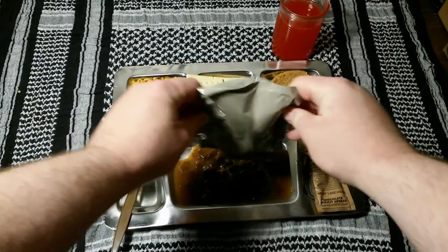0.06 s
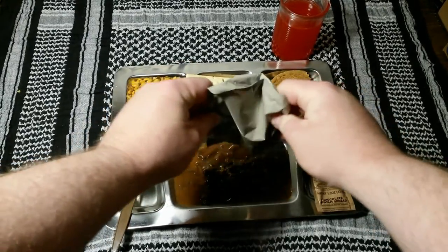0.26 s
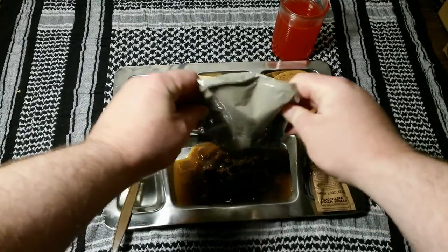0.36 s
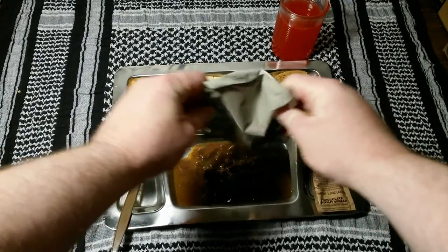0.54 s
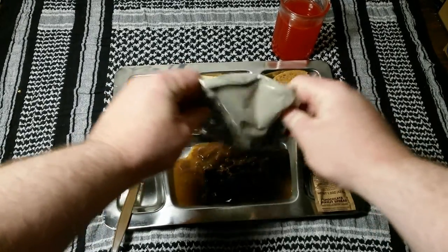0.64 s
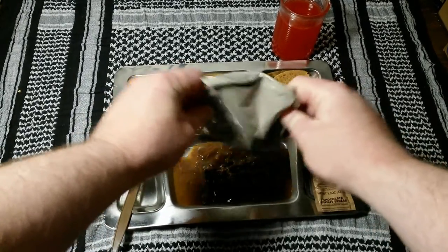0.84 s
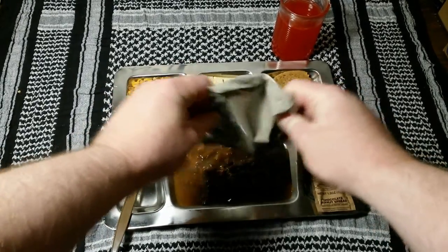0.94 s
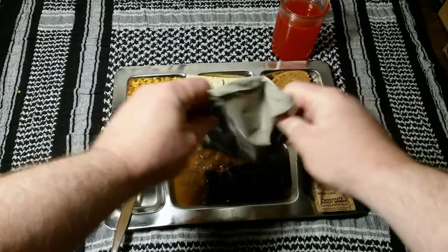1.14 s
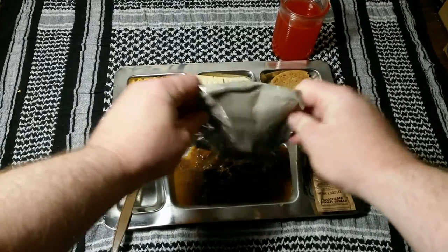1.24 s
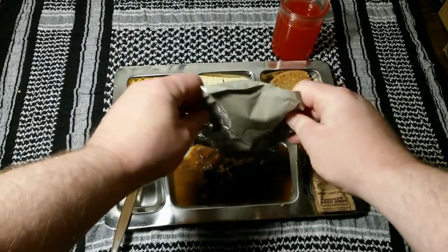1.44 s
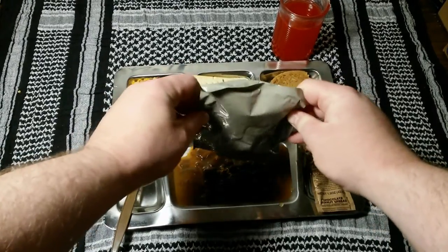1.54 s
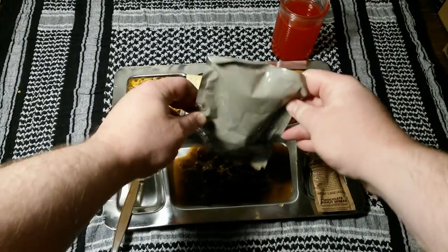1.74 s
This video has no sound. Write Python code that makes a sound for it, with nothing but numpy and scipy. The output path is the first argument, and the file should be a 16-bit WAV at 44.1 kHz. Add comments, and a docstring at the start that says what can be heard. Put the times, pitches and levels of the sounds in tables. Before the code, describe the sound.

A stiff foil pouch crinkles close up. A small snap and pop at 0.08 s leads to the loudest, brightest crackling cluster around 0.2 s. Lighter snaps follow near 0.37 and 0.52, then crackles and hollow pops at 0.6-0.9. Soft kneading rustle and denser crinkling run from 1.0 to 1.33, thinning to sparse ticks by 1.66. Short small-room reflections, slight tray ring, faint air, hum and wavering low rumble.

```python
"""A foil pouch is squeezed over a tray, close to the microphone in a small kitchen.
Creases snap as ragged noise bursts and ring the sheet's modes; scattered ticks make crackle and rustle.
Whole panels buckle with hollow pops, each a rising decaying sine inside a dull burst of noise.
Resonant filters ring the tray, and decaying noise responses supply near reflections and a short room tail.
Beneath lie noise-made room air, a faint mains hum and a low rumble of varying level."""
import sys
import numpy as np
from scipy import signal
from scipy.fft import rfft, irfft, next_fast_len
from scipy.io import wavfile

SR = 44100
rng = np.random.default_rng(int(sys.argv[2]) if len(sys.argv) > 2 else 0)


def materialize(psi):
    """Save the field psi as 16-bit PCM at rate SR to the path in sys.argv[1].

    A 1-D psi becomes a single channel; in a 2-D psi each row is a channel.
    """
    bounded = np.clip(np.atleast_2d(psi).T, -1, 1)
    quanta = np.round(bounded * 32767).astype(np.int16)
    wavfile.write(sys.argv[1], SR, quanta)


N = 77175
T = np.arange(N) / SR
BLOW_T = T[:2048]  # time axis of one snap or pop

# Level, left-minus-right level and likeness of the two channels (0-1) in each kind of burst.
CRACK_LEVEL_DB, CRACK_PAN_DB, CRACK_LIKENESS = 1.79, -4.1, 0.34
FOIL_LEVEL_DB, FOIL_PAN_DB, FOIL_LIKENESS = -1.2, -2.1, 0.8
POP_LEVEL_DB, POP_PAN_DB, POP_LIKENESS = -9.5, -2.6, 1

FOIL_DECAY_S, TYPICAL_CRACK_MS = 0.0062, 2.8
RING_LENGTH_LAW = 0.36  # exponent: a shorter crack leaves a shorter ring
SOFT_ATTACK_SHARE = 0.17  # a slower crease also takes longer to give way

# Crease snaps. Each row: start in seconds, relative crack level in dB, relative foil ring level in dB,
# crack brightness in dB per octave, crack decay (to 1/e) in milliseconds.
CREASE_SNAPS = [(.006, -46.5, -53.5, -12.5, 2.1), (0.074, -47, -41.5, -11, 4.9),
                (0.0833, -28, -39, -6.5, 0.66), (0.0866, -42.5, -34, 10, 3), (0.105, -40.5, -38, -0.5, 4.8),
                (.122, -38, -46.5, -3.5, 5), (.183, -32, -34.5, 5, 2.5), (0.1979, -27, -34, 0.5, 2.5),
                (0.2025, -14.5, -26, 10, 1.2), (0.2112, -23.5, -33.5, -6, 0.93),
                (0.214, -27, -29, -10.5, 0.47), (0.2228, -37, -38, -8.5, 1.3), (0.228, -29, -52, 9.5, 2.2),
                (0.2326, -25.5, -29, -3, 1.03), (0.3587, -43, -41, -5, 6.1),
                (0.3691, -39, -39.5, 12.5, 1.6), (.377, -33.5, -35, 0, 3.26), (.441, -70, -46.5, -9, 3.5),
                (.469, -62, -44.5, -9, 4.6), (0.504, -45, -41, -15.5, 2.4), (.524, -38.5, -38.5, -7, 2.1),
                (0.6032, -46, -41.5, -3, 6.6), (0.6193, -41, -37, 0, 2.2), (0.6255, -48, -36.5, -10, 3.4),
                (0.64, -47, -42.5, -12, 4), (.6575, -33, -33.5, -4.5, 2.5), (.663, -46, -54, -10, 1.6),
                (0.686, -40, -46, -1, 1.2), (0.6899, -34, -50, -9, 2.1), (0.7021, -25, -30, 2, 2.13),
                (0.8153, -53, -43.5, -1, 5.4), (.8395, -38.5, -49, -7.5, 1.3),
                (.8418, -30, -29, -8.5, 0.97), (0.8953, -37.5, -37.5, 2, 2.4), (.923, -48.5, -47, 6, 5.3),
                (.929, -49, -47.5, -9, 6.5), (.9425, -38.5, -44.5, -9.5, 1.5),
                (1.007, -35, -39.5, -8, 0.66), (1.0243, -38, -38.5, -7, 0.77), (1.031, -55, -39.5, -1, 2),
                (1.0458, -30.5, -33.5, -3, 2.5), (1.0949, -36.5, -43.5, -2, 2.9),
                (1.1078, -49, -40.5, -2, 1.3), (1.117, -44, -40.5, -9, 1.1), (1.1254, -56, -35, 2, 1.3),
                (1.1293, -44, -54, -12, 0.54), (1.165, -40, -55, -3.5, 1.14), (1.209, -52, -43.5, 1, 11),
                (1.2254, -30.5, -32.5, 1.5, 5), (1.233, -49, -32.5, 5, 1.1), (1.2498, -34.5, -35, 9, 1.8),
                (1.2539, -31, -30.5, -7.5, 1.8), (1.260, -39.5, -47, -5, 1.3), (1.292, -46, -38, 1, 2.1),
                (1.3, -38, -36, -8, 6), (1.3052, -27, -33.5, -7, 2.4), (1.3145, -31.5, -28.5, 1, 3.3),
                (1.326, -41, -33.5, -4, 4.3), (1.406, -51, -38, 0, 2), (1.419, -52, -43.5, 1, 1.4),
                (1.4279, -38.5, -40.5, -0.5, 1.7), (1.4825, -41.5, -36.5, -2, 2.5),
                (1.496, -35.5, -38, 1.5, 1.7), (1.6445, -55, -50, 7, 3), (1.6628, -48, -44, 10, 1.3)]
# Spectral shape of a crack. Each row: frequency in Hz, relative density in dB per Hz.
CRACK_COLOUR = [(150, -43.5), (900, -24.5), (1500, -24), (2200, -5.5), (3000, -4.5), (4000, 1.5), (6000, 2),
                (8000, -6), (10000, -13.5), (12000, -22), (15000, -37.5)]
# Spectral shape of the ringing foil. Each row: frequency in Hz, relative density in dB per Hz.
FOIL_COLOUR = [(120, -30.5), (220, -16.5), (450, 0), (620, -11), (760, 0), (860, -4), (1020, 1),
               (1170, -2.5), (1400, -8), (1600, -11), (1830, -7), (2150, -22), (2800, -12), (5000, -45)]


def creases():
    """Impulsive excitation: each snap is a crack, and a lower ring of the foil around it."""
    out = np.zeros((2, N))
    for start, crack_db, ring_db, tilt, decay_ms in CREASE_SNAPS:
        decay_s = decay_ms / 1000
        length = (decay_ms / TYPICAL_CRACK_MS) ** RING_LENGTH_LAW
        crack = burst(CRACK_COLOUR, decay_s, CRACK_LEVEL_DB, CRACK_PAN_DB, CRACK_LIKENESS,
                      tilt, SOFT_ATTACK_SHARE * decay_s)
        dense_ring = burst(FOIL_COLOUR, FOIL_DECAY_S * length, FOIL_LEVEL_DB, FOIL_PAN_DB, FOIL_LIKENESS)
        add(out, start, undb(crack_db) * crack)
        add(out, start, undb(ring_db) * (dense_ring + sheet_modes(length)))
    return out


MODE_SPREAD, RING_ATTACK_S = 0.04, 0.00059  # spread: standard deviation, as a share of the pitch
# Strongest modes of the stiff sheet. Each row: central frequency in Hz, relative level in dB,
# decay (to 1/e) in seconds before scaling by the ring length.
SHEET_MODES = [(753, -11, 0.0029), (1025, -7.5, 0.0069), (1119, -18, 0.0053), (1839, -18.5, 0.012)]


def sheet_modes(length):
    """Modal vibration: a few decaying sines, each detuned by the new fold."""
    ringing = 0
    for hz, db, decay_s in SHEET_MODES:
        detuned_hz = hz * (1 + MODE_SPREAD * rng.standard_normal())
        fade = np.exp(-BLOW_T / (decay_s * length))
        ringing = ringing + undb(db) * np.sin(2 * np.pi * detuned_hz * BLOW_T) * fade
    attack = 1 - np.exp(-BLOW_T / RING_ATTACK_S)
    return np.sqrt(2) * ringing * attack * pan(FOIL_PAN_DB)


CRACKLE_DB, CRACKLE_SCATTER_DB = -14, 4  # relative to the snap's crack level; standard deviation
CRACKLE_DELAY_S = 0.013  # mean wait after the snap


def crackle(count=3):
    """Stochastic relaxation: tiny creases give way at exponentially distributed delays after each snap."""
    out = np.zeros((2, N))
    for start, crack_db, *_ in CREASE_SNAPS:
        for _ in range(count):
            size_db = crack_db + CRACKLE_DB + CRACKLE_SCATTER_DB * rng.standard_normal()
            delay = CRACKLE_DELAY_S * rng.exponential()
            add(out, start + delay, undb(size_db) * tick(0.00047))
    return colour(out, CRACK_COLOUR) * pan(CRACK_PAN_DB)


BUCKLE_ATTACK_S = 0.00048
POP_TONE_DB = -3  # tone before each pop's own level
POP_GLIDE = 0.047  # the pitch rises by this share of the listed pitch as the panel settles
POP_HZ = 371  # the pitch at which a thud has the listed colour
POP_LOW_HZ = 151  # the pops carry little below this
# Panels buckling. Each row: start in seconds, relative level in dB, pitch midway through the glide in Hz,
# decay (to 1/e) in milliseconds.
PANEL_BUCKLES = [(.006, -46, 364, 6), (.087, -33.5, 393, 7.7), (.100, -42, 420, 3.5), (.187, -45, 402, 9.9),
                 (0.201, -47, 396, 3.3), (0.2133, -32, 427, 3.6), (0.2329, -29.5, 439, 6.4),
                 (.377, -33, 389, 6.7), (.468, -33.5, 321, 4.6), (0.576, -45, 315, 3.6),
                 (.621, -35, 359, 5.9), (0.7283, -31.5, 410.5, 6.8), (0.842, -32, 362, 3.5),
                 (0.895, -42.5, 366, 4.3), (0.978, -48, 338, 9), (1.024, -40, 430, 8.7),
                 (1.048, -41.5, 414, 5.1), (1.089, -46, 405, 3.4), (1.106, -39, 401, 5.7),
                 (1.1307, -31, 378, 4), (1.2281, -29.5, 349, 5.2), (1.244, -37.5, 442, 6.2),
                 (1.306, -31, 460, 2.3), (1.316, -32, 420, 6.9), (1.326, -35.5, 406, 5),
                 (1.406, -40, 370, 5), (1.427, -36.5, 407, 4.9), (1.484, -46.5, 393, 6)]
# Spectral shape of the thud at the reference pitch. Each row: frequency in Hz, relative density in dB per Hz.
POP_COLOUR = [(50, -32), (130, -23.5), (200, 4.5), (290, 0.5), (400, -3), (500, 0), (650, -2), (900, -11.5),
              (2000, -55)]


def panels():
    """Snap-through buckling: a flipping panel gives a hollow rising tone and a thud, lower if it is larger."""
    out = np.zeros((2, N))
    for start, db, hz, decay_ms in PANEL_BUCKLES:
        decay_s = decay_ms / 1000
        fade = np.exp(-BLOW_T / decay_s)
        pitch = hz * (1 + POP_GLIDE * (.5 - fade))
        phase = 2 * np.pi * np.cumsum(pitch) / SR
        tone = 2 * np.sin(phase) * fade * (1 - np.exp(-BLOW_T / BUCKLE_ATTACK_S))
        thud_colour = [(f * hz / POP_HZ, level) for f, level in POP_COLOUR]
        thud = burst(thud_colour, decay_s, POP_LEVEL_DB, POP_PAN_DB, POP_LIKENESS)
        add(out, start, undb(db) * (undb(POP_TONE_DB) * tone * pan(POP_PAN_DB) + thud))
    return signal.sosfilt(signal.butter(3, POP_LOW_HZ, "high", fs=SR, output="sos"), out)


KNEAD_CRACK_DB = -5  # crack-coloured part, relative to the foil-coloured part
# Kneading between the snaps. Each row: start in seconds, length in seconds, mean relative tick level in dB.
KNEADING = [(0.088, 0.065, -56.5), (0.446, 0.07, -54.5), (0.608, 0.14, -47.5), (0.899, 0.063, -59.5),
            (1.003, 0.16, -47.5), (1.236, 0.1, -50), (1.411, 0.079, -54.5)]


def rustle(count=18):
    """Granular friction: faint scattered ticks while the fingers knead the pouch."""
    out = np.zeros((2, N))
    for start, length, db in KNEADING:
        for k in range(count):
            when = start + length * (k + rng.random()) / count
            add(out, when, undb(db + 1.4 * rng.standard_normal()) * tick(0.0046))
    dull = colour(out, FOIL_COLOUR, tilt=-2.3)
    bright = colour(out, CRACK_COLOUR, tilt=-1.5)
    return (dull + undb(KNEAD_CRACK_DB) * bright) * pan(FOIL_PAN_DB)


# Fixed resonances of the tray and its surroundings. Each row: frequency in Hz, gain at the peak in dB
# before panning, time to fall by 60 dB in seconds.
TRAY_MODES = [(308, -6, .11), (395, -3.5, .1), (757, -7, .08), (1005, -8, .05), (1162, -12, .08),
              (1835, -15, .08)]


def surroundings(x):
    """Sympathetic resonance: the tray and the space around it ring briefly at their own pitches."""
    out = 0
    for hz, db, t60 in TRAY_MODES:
        q = np.pi * hz * t60 / np.log(1000)
        out = out + undb(db) * signal.lfilter(*signal.iirpeak(hz, q, fs=SR), x.mean(axis=0))
    return out * pan(FOIL_PAN_DB)


NEAR_DB, NEAR_T60_S = -7, 0.025
ROOM_DB, ROOM_T60_S, ROOM_BUILD_S = -5, 0.26, 0.011
TREBLE_HZ, TREBLE_T60_S = 3500, 0.15
ROOM_BASS_HZ = 500  # below this the reflections reach both channels alike
# Spectral shape of the reflections. Each row: frequency in Hz, relative density in dB per Hz.
REFLECTION_COLOUR = [(100, -21), (300, -2.5), (400, 0), (600, -8.5), (1500, -2), (4000, 0.5), (8000, 0),
                     (15000, 0.5)]


def echoes(x, db, t60, treble_t60, likeness):
    """Diffuse reverberation: dense reflections build up briefly and fade, the treble at its own pace."""
    noise = pair(N // 4, likeness)
    t = T[:N // 4]
    shared_bass = signal.butter(2, ROOM_BASS_HZ, fs=SR, output="sos")
    noise = noise + signal.sosfiltfilt(shared_bass, noise[1] - noise)
    below_treble = signal.sosfiltfilt(signal.butter(2, TREBLE_HZ, fs=SR, output="sos"), noise)
    build = 1 - np.exp(-t / ROOM_BUILD_S)
    fade = undb(-60 * t / t60) * build
    treble_fade = undb(-60 * t / treble_t60) * build
    decaying = below_treble * fade + (noise - below_treble) * treble_fade
    response = colour(decaying / np.linalg.norm(fade), REFLECTION_COLOUR)
    return undb(db) * signal.fftconvolve(x.mean(axis=0)[None], response, axes=1)[:, :N]


AIR_DB, AIR_LIKENESS, HISS_LIKENESS, AIR_BASS_HZ = -56.5, 0.53, 0.051, 1510
RUMBLE_DB = -6.5  # added to the rumble's level curve
# Spectral shape of the room air. Each row: frequency in Hz, relative density in dB per Hz.
AIR_COLOUR = [(25, -35.5), (120, -0.5), (250, 1), (460, -8), (750, -9), (1100, -17.5), (1800, -17.5),
              (3300, -22.5), (6000, -22), (13000, -23), (15000, -30)]
# Mains hum. Each row: frequency in Hz, RMS level in dB.
MAINS_HUM = [(59, -76.5), (119, -75)]
# Spectral shape of the rumble. Each row: frequency in Hz, relative density in dB per Hz.
RUMBLE_COLOUR = [(25, -17), (45, 0), (60, 10), (80, -10), (115, 19), (150, -12.5), (300, -53)]
# Level curve of the rumble. Each row: time in seconds, relative level in dB.
RUMBLE_CURVE = [(0.0, -55), (0.28, -63.5), (0.33, -46.5), (0.38, -60), (0.74, -68.5), (0.79, -51),
                (0.86, -61.5), (1.48, -65), (1.58, -47), (1.66, -58), (1.75, -47)]


def background():
    """Background noise and tones: air more alike on both sides in the bass, steady hum, varying rumble."""
    hiss = pair(N, HISS_LIKENESS)
    bass_filter = signal.butter(1, AIR_BASS_HZ, fs=SR)
    air = signal.lfilter(*bass_filter, pair(N, AIR_LIKENESS) - hiss) + hiss
    hum = 0
    for hz, db in MAINS_HUM:
        hum = hum + undb(db) * np.sqrt(2) * np.sin(2 * np.pi * (hz * T + rng.random()))
    rumble_gain = undb(RUMBLE_DB + np.interp(T, *np.array(RUMBLE_CURVE).T))
    rumble = rumble_gain * colour(pair(N, 0.71), RUMBLE_COLOUR)
    return undb(AIR_DB) * colour(air, AIR_COLOUR) + hum + rumble


RAGGED_DB = 6.5  # approximate spread of the level wandering


def burst(points, decay_s, level_db, pan_db, likeness, tilt=0, attack_s=.0001):
    """Dense modal response: a ragged noise kick dies away, with new noise for every kick."""
    fade = np.exp(-BLOW_T / decay_s)
    attack = 1 - np.exp(-BLOW_T / attack_s)
    ragged = undb(RAGGED_DB * walk(len(BLOW_T), 1000))
    x = colour(pair(len(BLOW_T), likeness) * fade * ragged * attack, points, tilt)
    # each channel gets the energy of the plain fade
    even = np.sqrt(np.sum(fade ** 2) / np.sum(x ** 2, axis=1, keepdims=True))
    return x * even * undb(level_db) * pan(pan_db)


def tick(decay_s, size=512):
    """Impulse excitation: the brief decaying noise of one tiny crease."""
    return pair(size, CRACK_LIKENESS) * np.exp(-T[:size] / decay_s)


def walk(n, rate):
    """Random modulation: linear interpolation between normal draws, rate per second, spread near 1."""
    return 1.2 * np.interp(T[:n] * rate, np.arange(400), rng.standard_normal(400))


def pair(n, likeness):
    """Interchannel correlation: shared and opposed noise make two channels this much alike."""
    mid, side = rng.standard_normal((2, n))
    opposed = side * np.array([[1], [-1]])
    return np.sqrt((1 + likeness) / 2) * mid + np.sqrt((1 - likeness) / 2) * opposed


def colour(x, points, tilt=0):
    """Minimum-phase filtering through (Hz, dB) points, tilted in dB per octave; white noise keeps its power."""
    n = next_fast_len(x.shape[-1], True)
    hz, db = np.array(points, float).T
    octave = np.log2(np.clip(np.fft.rfftfreq(n, 1 / SR), 1, None))
    gain = undb(np.interp(octave, np.log2(hz), db + tilt * np.log2(hz)))
    cepstrum = irfft(np.log(gain / np.sqrt(np.mean(gain ** 2))), n)
    # folding the cepstrum forward makes the filter causal
    cepstrum[1:n // 2] *= 2
    cepstrum[n // 2:] = 0
    return irfft(rfft(x, n) * np.exp(rfft(cepstrum)), n)[:, :x.shape[1]]


def undb(db):
    """Logarithmic level: decibels to amplitude ratio."""
    return 10 ** (np.asarray(db) / 20)


def pan(db):
    """Interchannel level difference: left minus right in dB, split between the channels."""
    return undb(np.array([[db], [-db]]) / 2)


def add(out, start_s, x):
    """Superposition: mix a sound in at its start time."""
    i = int(np.clip(start_s * SR, 0, N - 1))
    out[:, i:i + x.shape[1]] += x[:, :N - i]


LEFT_LAG_S = 4.5e-5  # rounded to whole samples
POP_ROOM_DB = -3  # the pops reach the room more weakly than the snaps


def scene():
    """Superposition of direct sound, near reflections, tray resonance, room tail and background."""
    crinkle = creases() + crackle() + rustle()
    pops = panels()
    pouch = crinkle + pops
    sent = crinkle + undb(POP_ROOM_DB) * pops
    late_left = np.interp(T - round(LEFT_LAG_S * SR) / SR, T, pouch[0])
    direct = np.array([late_left, pouch[1]])
    near = echoes(sent, NEAR_DB, NEAR_T60_S, NEAR_T60_S, likeness=0.16) * pan(-2.9)
    room = echoes(sent, ROOM_DB, ROOM_T60_S, TREBLE_T60_S, likeness=0.03) * pan(-0.85)
    return direct + near + surroundings(pouch) + room + background()


TOP_HZ = 14600


def record(dry):
    """Band limiting: the recorder cuts the top with a steep low-pass filter."""
    return signal.sosfilt(signal.ellip(8, .2, 70, TOP_HZ, fs=SR, output="sos"), dry)


dry = scene()
out = record(dry)
materialize(out)
```